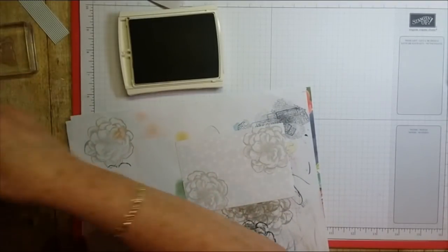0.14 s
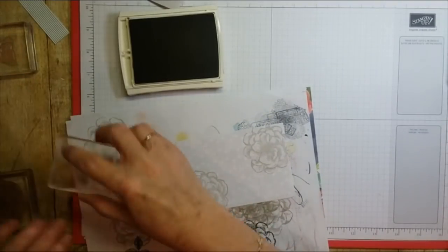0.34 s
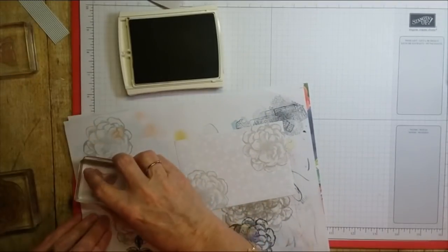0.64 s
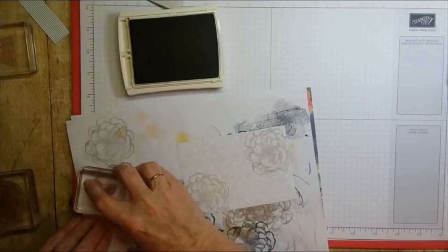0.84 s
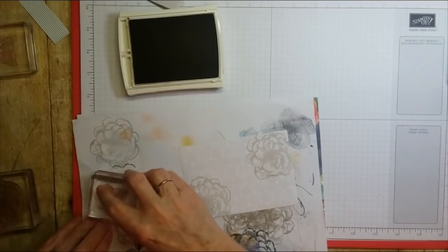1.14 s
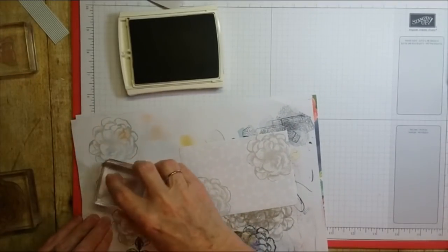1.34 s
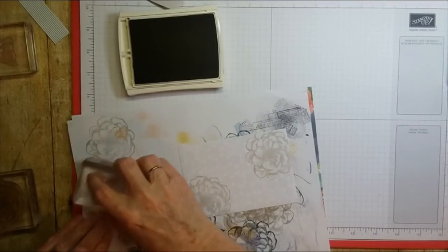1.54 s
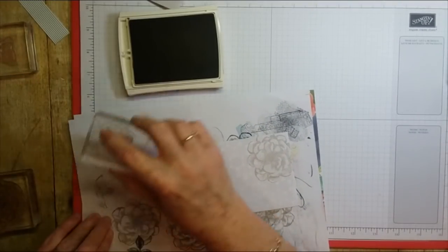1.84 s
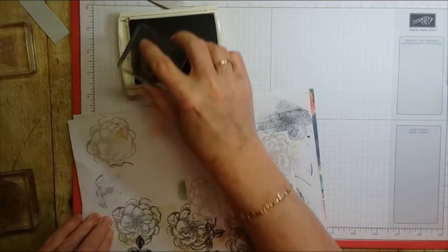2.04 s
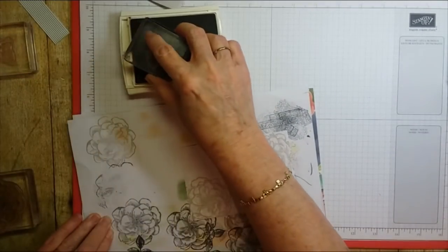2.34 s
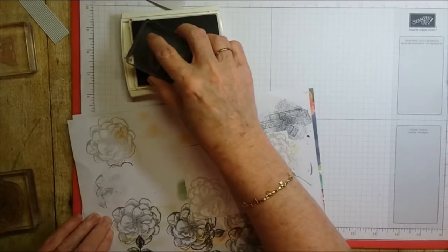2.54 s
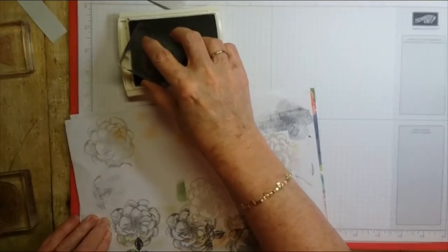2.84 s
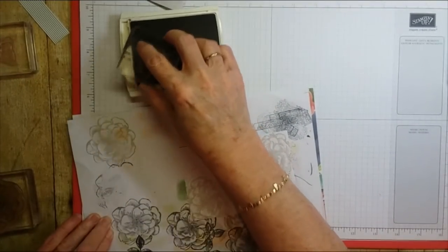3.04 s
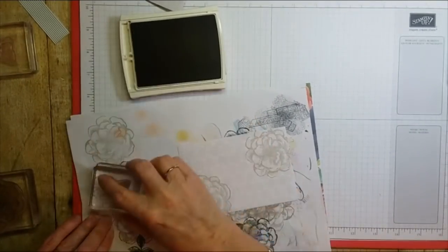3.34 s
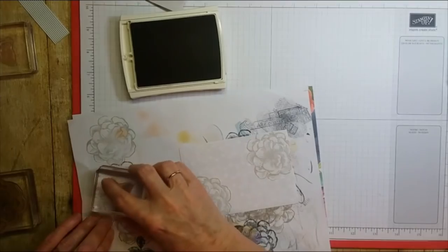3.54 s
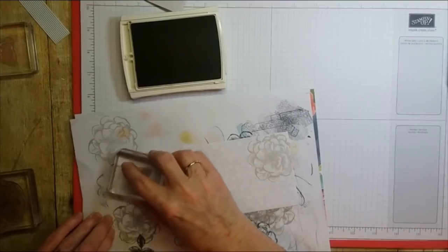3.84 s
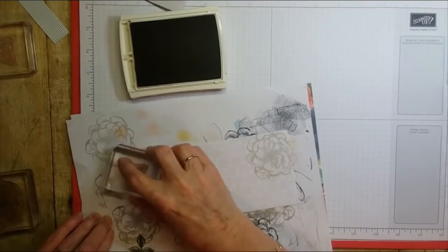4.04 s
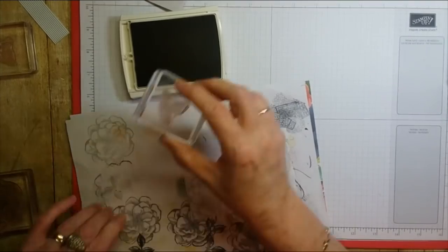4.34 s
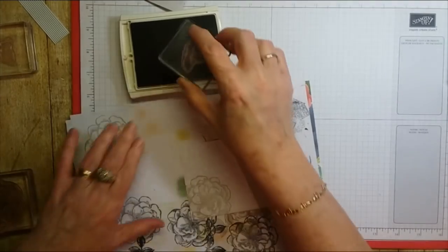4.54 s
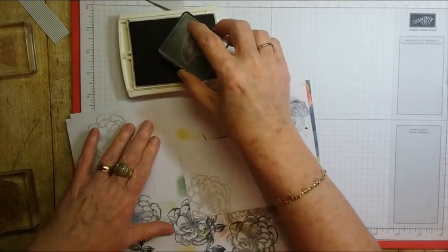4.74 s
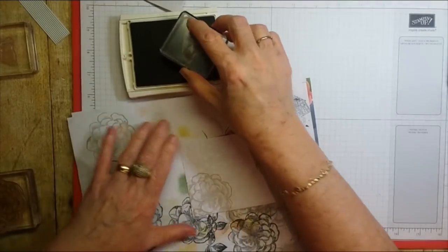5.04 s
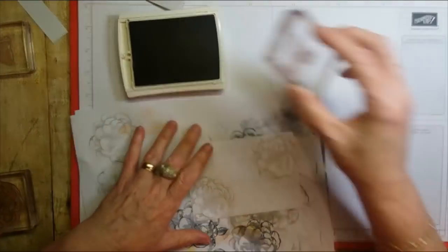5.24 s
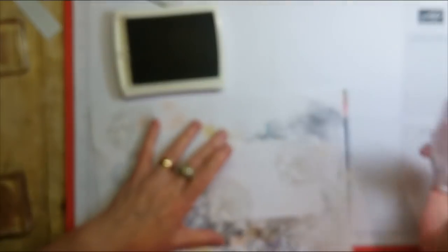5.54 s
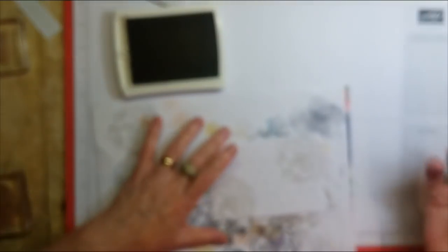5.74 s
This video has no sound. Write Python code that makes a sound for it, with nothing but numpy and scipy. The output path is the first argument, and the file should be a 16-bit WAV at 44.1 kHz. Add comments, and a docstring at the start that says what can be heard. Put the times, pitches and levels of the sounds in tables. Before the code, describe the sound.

Close stamping: boomy table knocks, sharp sticky snaps, quick muffled pad dabs with plastic rattle, and a final dry papery swish in a small room.

```python
"""Small room, wooden craft table: an acrylic stamp block is tapped on paper close to the microphone.
Each blow rings table modes under noisy contacts; the tacky stamp snaps free in sharp, coloured bursts.
After each run the block is dabbed on an ink pad whose plastic case rings; at the end a hand slides
over the paper as rubbed noise. A clock ticks faintly, a faint squeak opens, a steady noise lies below."""
import sys
import numpy as np
from scipy import signal
from scipy.fft import rfft, irfft
from scipy.io import wavfile
from scipy.ndimage import uniform_filter1d

SR = 44100
rng = np.random.default_rng(int(sys.argv[2]) if len(sys.argv) > 2 else 0)


def to_wav(sig):
    """Store sig (one row per channel, or 1-D mono) as 16-bit WAV at the path in sys.argv[1].

    Samples outside -1..1 are clipped; the rate is SR.
    """
    pcm = np.clip(np.atleast_2d(sig), -1, 1) * 32767
    pcm = np.round(pcm).astype(np.int16)
    wavfile.write(sys.argv[1], SR, pcm.T)  # frames by channels


N = 260250
TIME_S = np.arange(SR // 2) / SR
BLOW_S = 0.02  # reference duration for blow levels
LEAD_S = 0.025  # from the start of a contact to its push

# Steady background. Each row: frequency in Hz, density in dB per Hz.
FLOOR_SPECTRUM = [(15, -76.5), (25, -31.5), (87, -3.5), (130, -9.5), (180, -22.5), (242, -16), (270, -21.5),
                  (344, -22), (624, -26), (1440, -25), (2480, -28), (8830, -33), (16000, -26.5)]
FLOOR_DB = -65
# Room decay. Each row: frequency in Hz, t60 in seconds.
ROOM_DECAY = [(100, 0.65), (400, 0.43), (1200, 0.19), (4000, 0.2), (9000, 0.22), (16000, 0.23)]
# Stereo lean of the blows. Each row: frequency in Hz, left minus right in dB.
LEFT_LEAN = [(100, 0.5), (500, 2), (1000, 0), (2000, 2.5), (4000, 5), (8000, 3.5), (13000, -6)]

SQUEAK_HZ, SQUEAK_FALL_HZ_PER_S, SQUEAK_DB, SQUEAK_FADE_S = 930, 1500, -58.5, 0.034

# Clock case colour. Each row: frequency in Hz before pitch scaling, density in dB per Hz.
CLOCK_SPECTRUM = [(400, -23.5), (570, 7), (850, -19.5), (1700, -22), (2400, -10), (8000, -22)]
# Two clicks of each tick. Each row: delay in seconds, pitch as a multiple of the clock case's.
TICK_CLICKS = [(0, 1.06), (.027, .94)]
FIRST_TICK_S = 0.385

# Paper shifting under the block. Each row: loudest moment in seconds, level in dB, half length in seconds.
RUSTLES = [(0.553, -60.5, 0.01), (0.675, -62.5, 0.032), (1.795, -57, 0.024), (3.512, -56, 0.01),
           (3.616, -61.5, 0.046), (4.28, -63.5, 0.034), (4.378, -56, 0.0093), (4.749, -65, 0.028),
           (4.913, -63, 0.03)]
# Skin on paper. Each row: frequency in Hz, density in dB per Hz.
RUB_SPECTRUM = [(180, -33), (300, -24), (600, -9.5), (1460, -6.5), (2300, -1.5), (3000, -5.5), (4000, 0.5),
                (5340, -5.5), (8360, -4), (16000, -22)]
DRAG_DB, DRAG_HALF_S = -15, 0.012  # sheet drag round each snap, level over the snap
SLIDE_START_S, SLIDE_FASTEST_S, SLIDE_LIFT_S = 5.212, 5.512, 5.66
SLIDE_DB, SLIDE_ATTACK_S, SLIDE_RELEASE_S = -56.5, 0.013, 0.068
SLIDE_GAIN_DB_PER_S, SLIDE_EASE_DB_PER_S = 18, 31.5

# Block on the ink pad. Each row: time in seconds, thud in dB, hardness in dB per octave, case clack in dB,
# tick in dB, case pitch in Hz.
DABS = [(2.203, -45.5, -6, -57.5, -53.5, 1066), (2.369, -41, -1, -58.5, -70, 970),
        (2.516, -43.5, -1.5, -55.5, -80, 1040), (2.678, -41.5, 1, -43.5, -66, 1053),
        (2.851, -42, 2, -48.5, -66, 1010), (2.999, -42.5, 1.5, -44, -73, 1020),
        (4.688, -43, 2.5, -48, -65.5, 1048), (4.835, -38.5, 5.5, -52.5, -47, 1080),
        (5.004, -39, 6.5, -42.5, -42, 1077)]
# Case dropping back as the block lifts. Each row: time in seconds, level in dB, swell in seconds.
RATTLES = [(2.268, -60, 0.02), (2.438, -58, 0.011), (2.602, -58, 0.0015), (2.764, -50.5, 0.0008),
           (2.929, -52.5, 0.0039), (3.099, -58.5, 0.019), (5.079, -61, 0.001), (5.095, -61, 0.002)]
# Ink pad on the table. Each row: mode in Hz, level in dB, t60 in seconds.
PAD_MODES = [(71.1, -11.5, 0.38), (109.7, 0, 0.11), (131.6, -13.5, 0.29), (199.3, -7, 0.12),
             (277.5, -22, 0.17), (426, -16, 0.057)]
# Plastic case. Each row: mode as a multiple of the case pitch, level in dB, t60 in seconds.
CASE_MODES = [(.95, 11.5, 0.023), (1.1, -2, 0.022), (1.32, -11.5, 0.037), (2.25, -4, 0.0071)]
# Rim of the case. Each row: frequency in Hz, density in dB per Hz.
RIM_SPECTRUM = [(500, -1), (1500, -5.5), (2550, -2.5), (3300, -9.5), (4400, -6.5), (5050, -20.5),
                (5700, -11), (6400, -20), (7800, -14.5), (16000, -34)]
CASE_DROP_HZ = 1007
# First edge to touch. The row: lead in seconds, level over the drop in dB, pitch as a multiple of the drop's.
EDGE_FIRST = (.008, -2.4, 1.134)

# Stamp snapping off the paper. Each row: time in seconds, snap in dB, release length in seconds.
SNAPS = [(0.7837, -31.5, 0.0014), (1.0236, -30.5, 0.0024), (1.103, -49.5, 0.0074), (1.218, -35, 0.0017),
         (1.4063, -35.5, 0.0053), (1.584, -51, 0.0032), (3.8234, -56.5, 0.0011), (4.002, -51, 0.0019),
         (4.217, -61, 0.00096), (4.401, -61.5, 0.0058)]
# Snap of the release. Each row: frequency in Hz, density in dB per Hz.
SNAP_SPECTRUM = [(600, -30.5), (2000, -13.5), (2700, -5), (3300, 2), (4200, 0), (5200, -4), (7500, 3),
                 (9500, -0.5), (11000, -7), (13000, -6.5), (16000, -23)]
# Pop of the sheet. Each row: frequency in Hz, density in dB per Hz.
POP_SPECTRUM = [(150, -23), (700, -13), (950, -5), (1290, 6.5), (1600, -1.5), (2050, -17), (2650, -8),
                (3150, 3), (3800, 2), (4300, -11), (6000, -31)]
POP_DB, POP_DB_PER_S = 3.5, -1700  # over the snap, and change per second of release length

# Block on paper. Each row: time in seconds, table thump in dB, hardness in dB per octave, paper slap in dB,
# acrylic clack in dB, clack pitch in Hz.
KNOCKS = [(0.561, -34.5, -7.5, -51, -60, 1280), (.856, -21.5, -4, -46.5, -38.5, 1360),
          (1.082, -23.5, -5, -47.5, -42.5, 1250), (1.291, -22.5, -2, -43, -39.5, 1210),
          (1.4958, -18, -0.5, -37.5, -29, 1420), (1.662, -19, 0.5, -40.5, -38, 1250),
          (3.368, -27.5, -6, -49.5, -52, 1340), (3.568, -34.5, -10.5, -56.5, -59, 1230),
          (3.756, -22, 0, -39, -43.5, 1170), (3.911, -27, -3.5, -52.5, -45, 1220),
          (4.083, -21.5, -1.5, -43, -39.5, 1310)]
# Wooden table top. Each row: mode in Hz, level in dB, t60 in seconds.
TABLE_MODES = [(74.8, -21.5, .2), (105.5, -30.5, 0.42), (120.5, -13, 0.17), (136.1, 1, 0.069),
               (158.9, -16, 0.17), (191.5, -19.5, 0.21), (272.9, -20.5, 0.19), (300.3, -15, .13),
               (320.2, -6, .056), (357.2, -25, 0.19), (432.6, -20, 0.12), (481.3, -11.5, 0.049),
               (582, -30, 0.14)]
# Dense upper modes of the table. Each row: frequency in Hz, density in dB per Hz.
WOOD_SPECTRUM = [(150, -13), (330, -1), (480, -3), (720, -7), (1150, -10), (2400, -14), (5000, -35.5),
                 (10000, -39)]
# Acrylic clack. Each row: frequency as a multiple of the clack pitch, density in dB per Hz.
CLACK_SPECTRUM = [(.25, -15), (.55, -11.5), (.78, -0.5), (1, 3.5), (1.22, -4.5), (1.499, -13.5),
                  (1.9, -12.5), (2.699, -27), (6, -32.5)]
# Paper slap. Each row: frequency in Hz, density in dB per Hz.
SLAP_SPECTRUM = [(400, -13.5), (1500, 0), (2600, -0.5), (4000, 0.5), (5500, -7.5), (8300, -4.5),
                 (12000, -16.5), (16000, -25.5)]


def amp(db):
    """Decibels to amplitude factor."""
    return 10 ** (np.asarray(db) / 20)


def read(points, hz):
    """Straight lines on a log-frequency axis."""
    point_hz, value = np.transpose(points)
    return np.interp(np.log(hz + 1e-6), np.log(point_hz), value)


def add(mix, start_s, sound):
    """Lays a sound into the mix, cut at both ends of the mix."""
    start = round(start_s * SR)
    sound, part = sound[..., max(-start, 0):], mix[..., max(start, 0):]
    size = min(sound.shape[-1], part.shape[-1])
    part[..., :size] += sound[..., :size]


def at_level(sound, db):
    """Scales each channel so that its energy equals db held for BLOW_S."""
    rms = np.sqrt(np.sum(sound ** 2, -1, keepdims=True) / (BLOW_S * SR))
    return amp(db) * sound / rms


def colour(x, points, unit=1, size=4096):
    """Minimum-phase filter with the given spectrum: it rings only after what excites it."""
    hz = abs(np.fft.fftfreq(size, 1 / SR))
    log_gain = np.log(amp(read(points, hz / unit)))
    spectrum = np.exp(np.conj(signal.hilbert(log_gain)))
    taps = np.fft.ifft(spectrum).real[:size // 2]
    return signal.fftconvolve(x, taps[None], axes=1)[:, :x.shape[1]]


def contact(swell_s, length_s, scatter, spread, grit_db=4):
    """A crowd of tiny contacts swells to one sharp push, LEAD_S in, and dies; partly different in each ear."""
    t = TIME_S - LEAD_S
    shared, *own = rng.standard_normal((3, len(t)))
    grit = np.repeat(rng.standard_normal(len(t) // 20 + 1), 20)[:len(t)]
    envelope = np.exp(-np.maximum(t / length_s, -t / swell_s))
    crowd = (shared + spread * np.array(own)) * amp(grit_db * grit) * envelope
    crowd *= scatter / np.linalg.norm(crowd[0])  # against a push of 1
    crowd[:, round(LEAD_S * SR)] += 1
    return crowd


def ring(modes, hardness_db, rise_cycles, unit=1):
    """Dying modes that swell over their first cycles, the high ones first; a hard blow favours the high ones."""
    hz, db, t60_s = np.transpose(modes)[:, :, None]
    level = amp(db + hardness_db * np.log2(hz / hz[0]) + rng.normal(0, 1.0, hz.shape))
    turns = unit * hz * TIME_S
    rise = 1 - np.exp(-turns / rise_cycles)
    decay = np.exp(-np.log(1000) * TIME_S / t60_s)
    return (level * rise * decay * np.sin(2 * np.pi * turns)).sum(0)


def noise(points, bass_hz=250):
    """Steady stereo noise of rms 1, alike in both ears only in the bass."""
    hz = np.fft.rfftfreq(N, 1 / SR)
    left, other = rfft(rng.standard_normal((2, N)))
    same = 1 / (1 + (hz / bass_hz) ** 2)
    right = same * left + np.sqrt(1 - same ** 2) * other
    x = irfft(np.array([left, right]) * amp(read(points, hz)), N)
    return x / x.std()


def room(x, first_s=0.0089, build_s=0.0037):
    """Sparse reflections from the walls, each band dying at its own speed."""
    taps = rng.standard_normal((2, len(TIME_S))) * (rng.random((2, len(TIME_S))) < 0.12)
    taps *= 1 - np.exp(-np.maximum(TIME_S - first_s, 0) / build_s)
    hz, t, bands = signal.stft(taps, SR, nperseg=256)
    decay = np.exp(-np.log(1000) * t / read(ROOM_DECAY, hz)[:, None])
    tail = signal.istft(bands * decay, SR)[1]
    return signal.fftconvolve(x, tail / np.linalg.norm(tail[0]), axes=1)[:, :N]


def squeak(octave_db=-7, waver=0.071):
    """A falling, wavering tone and its octave, heard only by way of the walls."""
    jitter = uniform_filter1d(rng.standard_normal(len(TIME_S)), size=150)
    hz = (SQUEAK_HZ - SQUEAK_FALL_HZ_PER_S * TIME_S) * (1 + waver * jitter / jitter.std())
    turns = np.cumsum(hz) / SR
    tone = np.sin(2 * np.pi * turns) + amp(octave_db) * np.sin(4 * np.pi * turns)
    out = np.zeros((2, N))
    add(out, 0, at_level(tone * np.exp(-TIME_S / SQUEAK_FADE_S), SQUEAK_DB))
    # half of LEAD_S earlier; what passes the start wraps to the end
    return np.roll(room(out), -round(LEAD_S * SR) // 2, axis=1)


def clock(db=-64):
    """Two soft swelling contacts, coloured by the clock case, make a faint double tick every second."""
    out = np.zeros((2, N))
    for tick_s in np.arange(FIRST_TICK_S, N / SR, 1):
        for delay_s, pitch in TICK_CLICKS:
            push = contact(swell_s=0.0073, length_s=0.033, scatter=8.8, spread=0.93)
            click = colour(push, CLOCK_SPECTRUM, unit=pitch)
            add(out, tick_s + delay_s - LEAD_S, at_level(click, db))
    return out


def stroke(t):
    """Strength of the hand's slide: a brisk start, a slow swell and ebb, a quick release."""
    attack = np.clip((t - SLIDE_START_S) / SLIDE_ATTACK_S, 0, 1)
    gain_db = SLIDE_GAIN_DB_PER_S * (SLIDE_FASTEST_S - t)
    ease_db = SLIDE_EASE_DB_PER_S * (t - SLIDE_FASTEST_S)
    release = np.exp(-np.maximum(t - SLIDE_LIFT_S, 0) / SLIDE_RELEASE_S)
    return attack * amp(SLIDE_DB - np.maximum(gain_db, ease_db)) * release


def paper(grain_db=2.5, pressure_db=1.4, split_hz=3200):
    """Friction noise for rustles, snap drags and the hand; low scrape and high hiss catch and slip apart."""
    t = np.arange(N) / SR
    drags = [(s, snap_db + DRAG_DB, DRAG_HALF_S) for s, snap_db, _ in SNAPS]
    strength = stroke(t)
    for middle_s, db, half_s in list(RUSTLES) + drags:
        strength = strength + amp(db) * np.exp(-((t - middle_s) / half_s) ** 2 / 2)
    rub, out = noise(RUB_SPECTRUM), np.zeros((2, N))
    scrape = signal.sosfiltfilt(signal.butter(4, split_hz, fs=SR, output="sos"), rub)
    for band in (scrape, rub - scrape):
        fibres = uniform_filter1d(rng.standard_normal(N), size=90)
        pressure = uniform_filter1d(rng.standard_normal(N), size=1100)
        out += band * amp(grain_db * fibres / fibres.std() + pressure_db * pressure / pressure.std())
    return out * strength


def case_ring(push, hz):
    """The hollow plastic case answers whatever touches it."""
    modes = ring(CASE_MODES, 0, rise_cycles=1.24, unit=hz)
    return signal.fftconvolve(push, modes[None], axes=1)


def dabs(wood_db=-13, scrape_db=-8):
    """The soft pad cushions the blow; its plastic case clacks and drops back edge first as the block lifts."""
    low, high = np.zeros((2, 2, N))
    for s, thud_db, hardness_db, case_db, tick_db, case_hz in DABS:
        add(low, s, at_level(ring(PAD_MODES, hardness_db, rise_cycles=0.67), thud_db))
        push = contact(swell_s=0.0008, length_s=0.004, scatter=0.45, spread=0.6)
        add(high, s + 0.00089 - LEAD_S, at_level(case_ring(push, case_hz), case_db))
        # block edge grazes the case rim
        graze = colour(contact(swell_s=0.0012, length_s=0.015, scatter=3.6, spread=0.94), RIM_SPECTRUM)
        add(high, s + 0.00204 - LEAD_S, at_level(graze, tick_db))
        wood = colour(contact(swell_s=0.0024, length_s=0.051, scatter=3.8, spread=0.91), WOOD_SPECTRUM)
        add(low, s + 0.001006 - LEAD_S, at_level(wood, thud_db + wood_db + hardness_db / 2))
    for s, db, swell_s in RATTLES:
        for early_s, touch_db, pitch in (EDGE_FIRST, (0, 0, 1)):
            push = contact(swell_s, length_s=0.002, scatter=1, spread=0.5)
            touch = case_ring(push, pitch * CASE_DROP_HZ)
            add(high, s - early_s - LEAD_S, at_level(touch, db + touch_db))
        push = contact(swell_s + 0.0078, length_s=0.016, scatter=8, spread=0.46, grit_db=7)
        scrape = colour(push, RIM_SPECTRUM)
        add(high, s - LEAD_S, at_level(scrape, db + scrape_db))
    return low, high


def snaps(reflection_s=0.0051, reflection_db=-7, peel_db=-9):
    """The inked rubber peels and snaps free; the sheet pops flat, a nearby surface reflects the pop."""
    out = np.zeros((2, N))
    for s, snap_db, length_s in SNAPS:
        peel = colour(contact(swell_s=0.0018, length_s=0.011, scatter=10, spread=0.85), SNAP_SPECTRUM)
        add(out, s - LEAD_S, at_level(peel, snap_db + peel_db))
        snap = colour(contact(0.00025, length_s, scatter=4, spread=1, grit_db=2.5), SNAP_SPECTRUM)
        add(out, s - LEAD_S, at_level(snap, snap_db))
        # a quick release pops the sheet hardest
        pop_db = snap_db + POP_DB + POP_DB_PER_S * length_s
        # direct, then reflected, with fresh grain
        for delay_s, db in ((0, 0), (reflection_s, reflection_db)):
            pop = colour(contact(0.00018, length_s, scatter=0.4, spread=0.5), POP_SPECTRUM)
            add(out, s + delay_s - LEAD_S, at_level(pop, pop_db + db))
    return out


def knocks(wood_db=-19, wood_per_hardness=0.44):
    """The block lands flat: the table booms, the acrylic clacks, the paper slaps."""
    low, high = np.zeros((2, 2, N))
    for s, thump_db, hardness_db, slap_db, clack_db, clack_hz in KNOCKS:
        add(low, s + 0.0015, at_level(ring(TABLE_MODES, hardness_db, rise_cycles=2.1), thump_db))
        push = contact(swell_s=0.0006, length_s=0.005, scatter=0.7, spread=0.5)
        clack = colour(push, CLACK_SPECTRUM, unit=clack_hz)
        add(high, s + 0.000967 - LEAD_S, at_level(clack, clack_db))
        slap = colour(contact(swell_s=0.0015, length_s=0.013, scatter=16.0, spread=1.0), SLAP_SPECTRUM)
        add(high, s + 0.001064 - LEAD_S, at_level(slap, slap_db))
        # dense upper modes peak later and chatter on
        wood = colour(contact(swell_s=0.01, length_s=0.028, scatter=5.4, spread=0.3), WOOD_SPECTRUM)
        add(low, s + 0.01 - LEAD_S, at_level(wood, thump_db + wood_db + wood_per_hardness * hardness_db))
    return low, high


def from_left(x, delay_samples=8):
    """The work lies to the left: the right ear hears it a few samples later."""
    return np.array([x[0], np.pad(x[1], (delay_samples, 0))[:N]])


def scene(knock_wet_db=-7, dab_wet_db=-10, snap_wet_db=-9, boom_wet_db=-27):
    """Blows and paper in the room, over a faint steady background; the ink pad lies nearer the middle."""
    background = amp(FLOOR_DB) * noise(FLOOR_SPECTRUM)
    rub = paper()
    thud, case = dabs()
    snap = snaps()
    boom, clack = knocks()
    sent = amp(knock_wet_db) * (clack + rub) + amp(dab_wet_db) * case + amp(snap_wet_db) * snap
    boom_tail = amp(boom_wet_db) * room(boom + thud)[0]  # long waves reach both ears alike
    direct = from_left(boom + clack + snap) + from_left(thud + case, delay_samples=5)
    blows = direct + room(sent) + boom_tail
    half_lean_db = read(LEFT_LEAN, np.fft.rfftfreq(N, 1 / SR)) / 2
    blows = irfft(rfft(blows) * amp([half_lean_db, -half_lean_db]), N)
    return blows + rub + clock() + squeak() + background


def record(dry, low_cut_hz=52, edge_hz=16300):
    """The microphone sheds deep bass; then the band limit."""
    thin = signal.sosfilt(signal.butter(2, low_cut_hz, "highpass", fs=SR, output="sos"), dry)
    edge = signal.firwin(511, edge_hz, window=("kaiser", 9), fs=SR)
    return signal.oaconvolve(thin, edge[None], "same")


dry = scene()
out = record(dry)
to_wav(out)
```